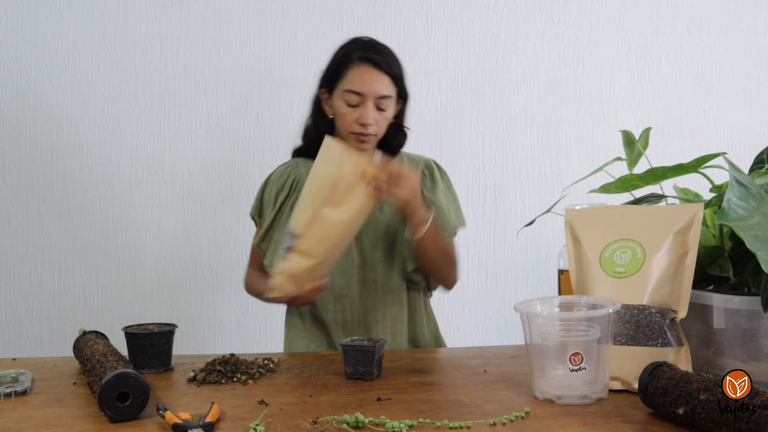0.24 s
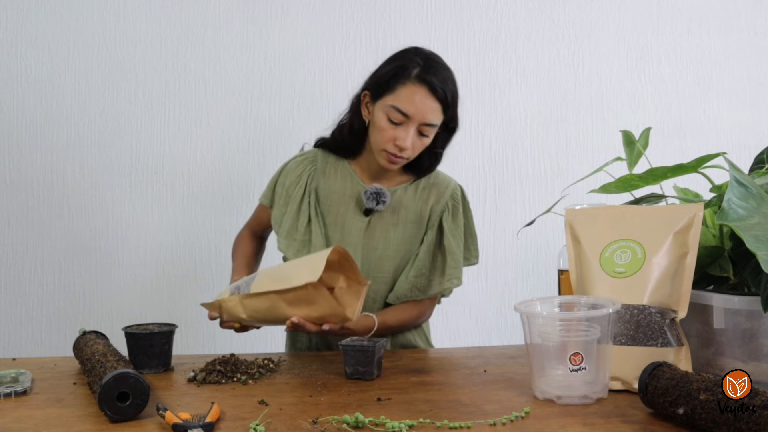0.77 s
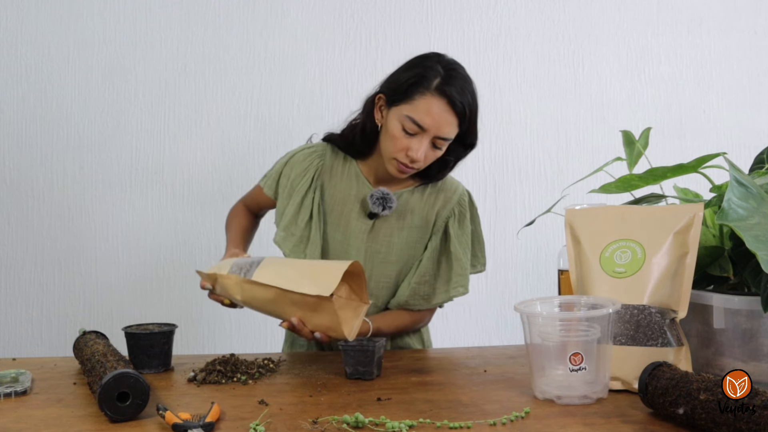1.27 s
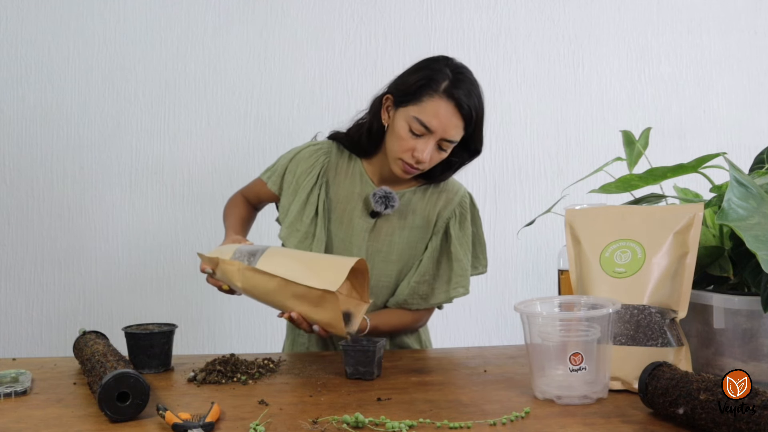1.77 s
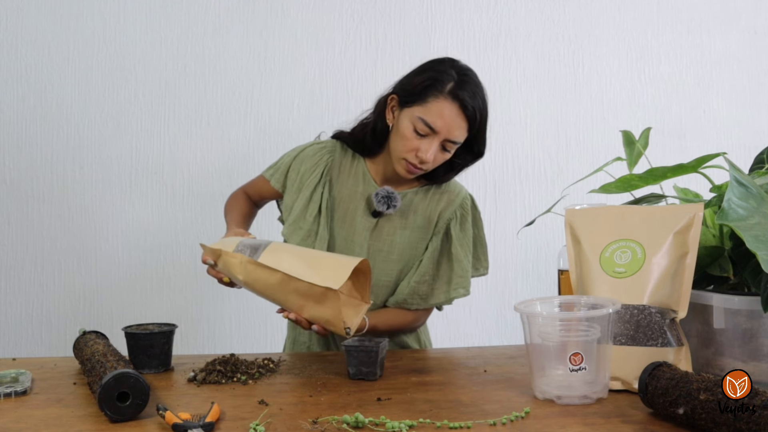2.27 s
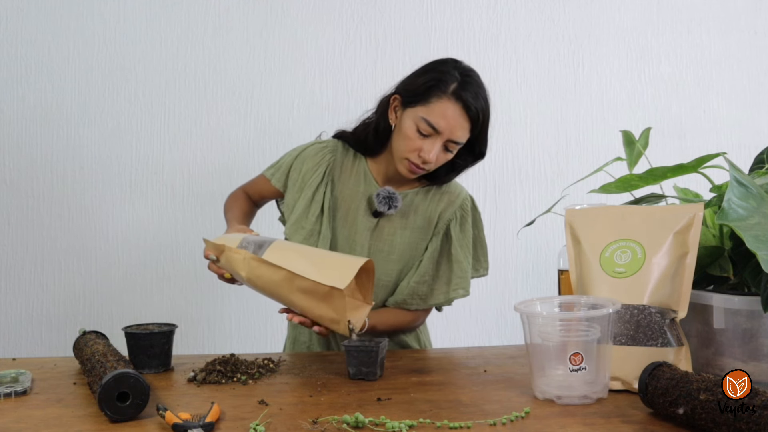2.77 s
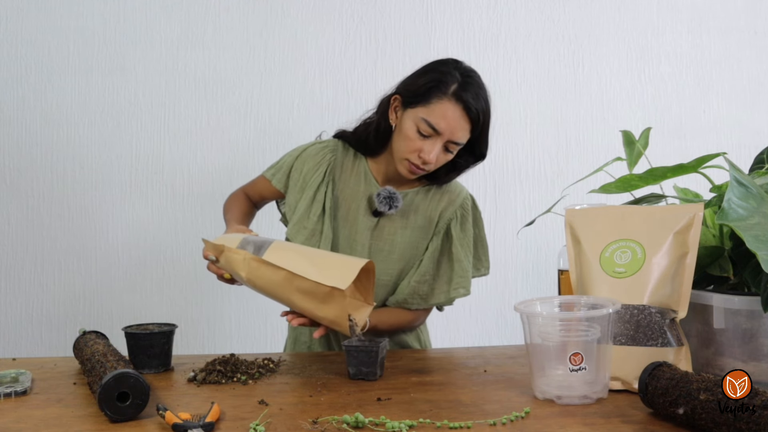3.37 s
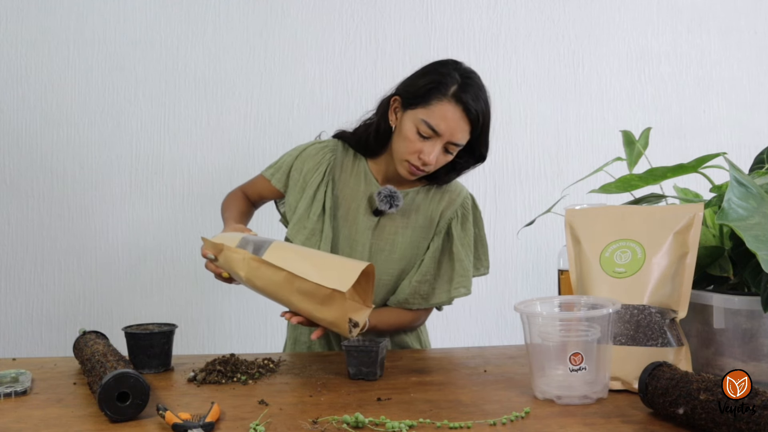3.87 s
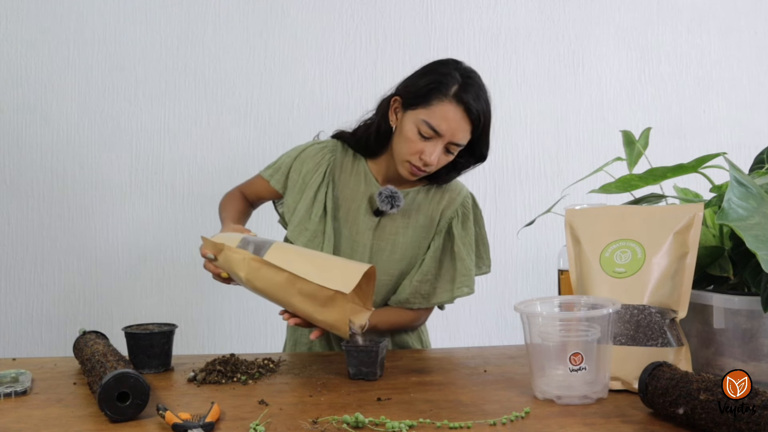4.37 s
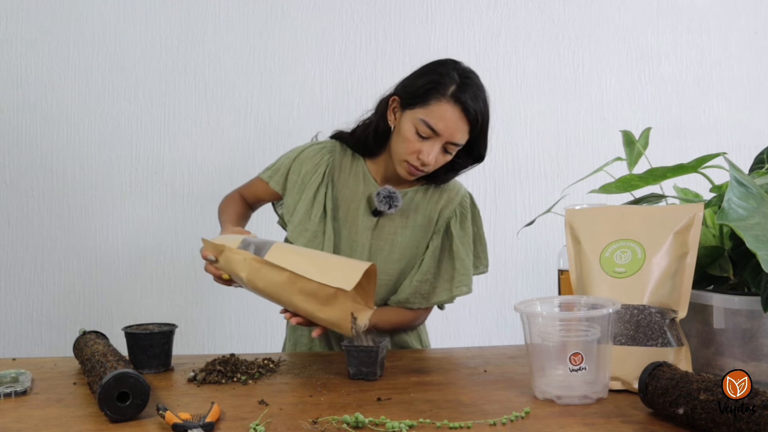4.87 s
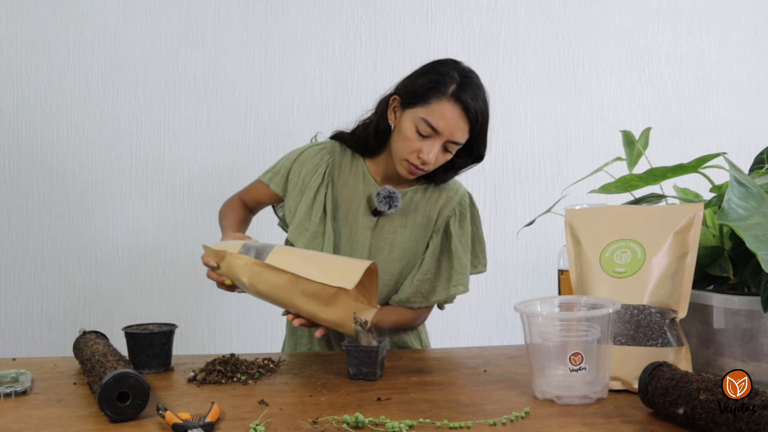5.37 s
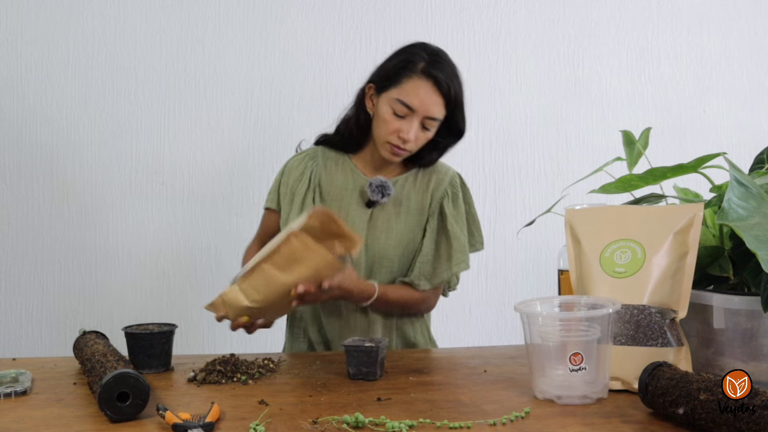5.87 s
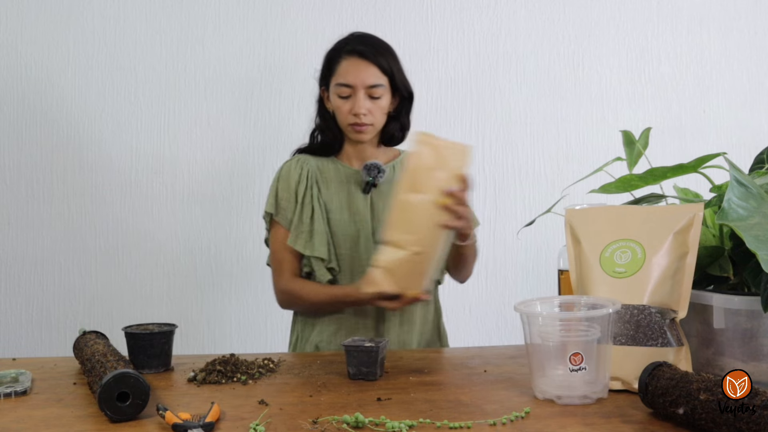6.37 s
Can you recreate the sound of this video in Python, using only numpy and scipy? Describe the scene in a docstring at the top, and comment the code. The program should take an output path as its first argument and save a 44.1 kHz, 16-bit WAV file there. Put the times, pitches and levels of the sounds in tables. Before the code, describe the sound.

Gritty potting mix slides down a crinkling paper bag and trickles in uneven spurts into a small plastic pot, heard close up.

```python
"""Potting mix poured from a paper bag

At a table, heard close up on a lapel microphone. The bag is tipped and the gritty mix slides down
it, trickles in spurts into a small plastic pot, then slides back as the bag is righted. Lumps drum
on the paper, fine grit hisses and rings the pot, creases snap. The moving arm shakes the microphone
at a low pitch; behind it all lie still air and a short room echo."""
import sys
import numpy as np
from scipy import signal
from scipy.fft import rfft, irfft, next_fast_len
from scipy.io import wavfile
from scipy.ndimage import uniform_filter1d, map_coordinates

SR = 44100
rng = np.random.default_rng(int(sys.argv[2]) if len(sys.argv) > 2 else 0)


def int16_out(signal):
    """Quantize to a 16-bit WAV file."""
    q = np.round(np.clip(np.atleast_2d(signal).T, -1, 1) * 32767)
    wavfile.write(sys.argv[1], SR, q.astype(np.int16))


N = 291724
TIME = np.arange(N) / SR


def amp(db):
    """Gain of a level in dB."""
    return 10 ** (np.asarray(db) / 20)


def unit(x):
    """x at rms 1."""
    return x / np.sqrt(np.mean(x ** 2) + 1e-20)


def along(points, hz):
    """(Hz, value) points joined on a log frequency axis."""
    knots, values = np.transpose(points)
    return np.interp(np.log(hz + 1), np.log(knots + 1), values)


def spectrum(points):
    """The response that runs through (Hz, dB) points."""
    return lambda hz: amp(along(points, hz))


def modes(table):
    """The causal response of (Hz, width Hz, dB) resonances."""
    return lambda hz: sum((-1) ** k * amp(db) * 1j * hz * width / (centre ** 2 - hz ** 2 + 1j * hz * width)
                          for k, (centre, width, db) in enumerate(table))


def filtered(x, response):
    """x times a complex response of frequency."""
    size = next_fast_len(N + SR // 2)
    return irfft(rfft(x, size) * response(np.fft.rfftfreq(size, 1 / SR)), size)[..., :N]


def wobble(rate):
    """A smooth random curve, rate knots a second."""
    return map_coordinates(rng.standard_normal(int(N * rate / SR) + 4), [TIME * rate])


def swells(start, lasts, db, rise, fall):
    """One gain curve per event: it rises until start, holds, then falls; slopes in dB per second."""
    t = TIME - start[:, None]
    attack_db = np.reshape(rise, (-1, 1)) * np.minimum(t, 0)
    return amp(db[:, None] + attack_db - fall * np.maximum(t - lasts[:, None], 0))


def bump(hz, centre, width):
    """A bell curve on a log frequency axis."""
    return np.exp(-(np.log((hz + 1) / centre) / width) ** 2)


def painted(x, gain):
    """x at rms 1, coloured by gain(hz, sample) at equal loudness, with random patches."""
    hz, t, frames = signal.stft(x, SR, nperseg=256)
    patches = uniform_filter1d(rng.standard_normal(frames.shape), size=4, axis=0)
    patches = unit(uniform_filter1d(patches, size=12, axis=1))
    colour = gain(hz[:, None], np.minimum((t * SR).astype(int), N - 1))
    loudness = np.sqrt(np.mean(np.abs(frames) ** 2, axis=1) @ colour ** 2)
    return unit(signal.istft(frames * colour / loudness * amp(2.12 * patches), SR, nperseg=256)[1][:N])


# The air around the table. Each row: frequency in Hz, relative level in dB.
AIR_SPECTRUM = [(15, -18), (25, 4), (107, -16), (723, -18), (2120, -24), (3180, -25.5), (3840, -24),
                (6400, -26.5), (11300, -31.5), (15600, -45)]


def still_air():
    """Faint, steady room noise, strongest in the deep bass."""
    return amp(-55.5) * unit(filtered(rng.standard_normal(N), spectrum(AIR_SPECTRUM)))


# The room beyond the table. Each row: frequency in Hz, seconds to die away by 60 dB.
ROOM_DECAY = [(200, 0.5), (2000, 0.043), (10000, 0.24)]


def room_echo(x):
    """Each frequency of the room's answer dies at its own speed."""
    hz, t, frames = signal.stft(rng.standard_normal(SR // 2), SR, nperseg=256)
    tail = signal.istft(frames * amp(-60 * t / along(ROOM_DECAY, hz)[:, None]), SR, nperseg=256)[1]
    return signal.fftconvolve(np.pad(x, (200, 0)), tail / np.linalg.norm(tail))[:N]


# Arm movements, felt right at the lapel.
# Each row: start in seconds, hold in seconds, relative level in dB, rumble as a ratio to the note.
ARM_MOVES = [(0.029, 0.27, -28.5, .4), (0.972, .1, -48, 0.27), (1.353, 0.49, -43, 0.36),
             (1.811, 0.028, -20.5, 0.49), (1.95, 0.14, -36.5, 0.39), (2.135, 0.12, -24.5, 0.12),
             (2.448, .1, -38, .1), (2.585, 0.15, -22.5, 0.17), (2.845, 0.0081, -42, 0.96),
             (2.979, 0.029, -41, .05), (3.082, 0.28, -33.5, 0.2), (3.44, 0.7, -49, 0.12),
             (4.304, 0.49, -57, .25), (4.792, 0.16, -49, 0.31), (5.19, 0.026, -48, .25),
             (5.452, 0.075, -47.5, 0.33), (5.943, 0.18, -51.5, .4), (6.227, 0.13, -32.5, 0.63),
             (6.474, 0.015, -31, 0.74)]
# The note of the swaying microphone. Each row: time in seconds, pitch in Hz.
SWAY_PITCH = [(0.0, 32.1), (1.2, 29.9), (1.8, 35.9), (1.969, 44), (2.129, 54.5), (2.8, 54.2), (3.06, 42.4),
              (3.33, 41), (3.47, 52.2), (4.1, 66), (4.38, 64), (4.68, 34.6), (4.95, 34.2), (5.2, 54),
              (5.451, 41.8), (5.728, 34.3), (6.62, 33)]


def microphone_shake():
    """The clipped-on microphone sways on the cloth: an unsteady low note with a rumble."""
    start, lasts, db, rumble_share = np.transpose(ARM_MOVES)
    levels = swells(start, lasts, db, rise=1000, fall=200) * amp(1.2 * wobble(3.9))
    hz = np.interp(TIME, *np.transpose(SWAY_PITCH)) * (1 + 0.026 * wobble(37))
    sway = np.sin(2 * np.pi * np.cumsum(hz) / SR)
    rumble = unit(filtered(rng.standard_normal(N), modes([(45.6, 36, 1.5), (125, 37, 0.5)])))
    return 0.84 * levels.sum(axis=0) * sway + 0.83 * (rumble_share @ levels) * rumble


# Creases and stones in the bag, within arm's reach. Each row: start in seconds, level in dB,
# knock in Hz, tick in Hz, tick weight in dB (halved to give the tick's share).
SNAPS = [(0.131, -13.5, 550, 4480, 1), (0.164, -19, 900, 4600, 1.5), (0.231, -17, 197, 6300, -50),
         (0.233, -21.5, 990, 6300, -50), (0.236, -18.5, 490, 6300, -24), (0.4, -20, 920, 4470, -12),
         (0.454, -19.5, 1220, 4970, -11), (0.491, -9, 1120, 4870, -27), (0.501, -6, 720, 4900, -34),
         (0.528, -11.5, 1450, 2980, -30), (0.534, -11, 640, 3200, -29), (0.547, 1, 890, 3230, -39),
         (0.567, -22, 800, 3800, -10), (0.59, -10, 710, 4400, -17), (0.634, -13, 1400, 4600, 5),
         (0.699, -6, 334, 3750, -19), (0.704, -3, 1150, 3970, -30), (0.841, -8.5, 1890, 4200, -25),
         (0.906, -11.5, 870, 5280, -45), (0.929, -15, 1080, 3360, -32), (0.965, -10, 1370, 3400, -40),
         (0.978, -7.5, 1770, 3470, -43), (1.029, -25, 760, 3700, -3), (1.059, -0.5, 725, 4670, -35),
         (1.095, -13.5, 1180, 3380, -19), (1.123, -11, 1710, 3430, -47), (1.19, -33, 1213, 7000, -8),
         (1.205, -4.5, 1650, 6400, -31), (1.225, -13, 1440, 3460, -37), (1.258, -24, 1310, 3540, -30),
         (1.283, -17, 630, 3500, -21), (1.304, -12, 467, 5030, -36), (1.325, -13.5, 686, 5200, -11),
         (1.353, -10.5, 1160, 6950, -15), (1.38, -10.5, 1580, 6630, -30), (1.415, -20, 807, 6960, 0),
         (1.431, -12, 520, 7360, -3.5), (1.473, -11, 1550, 5070, -35), (1.54, -9, 1110, 5140, -36),
         (1.744, -24.5, 125, 5000, -50), (1.78, -28, 1170, 5000, -33), (1.837, -18.5, 705, 4930, -28),
         (1.862, -15, 1280, 3020, -29), (1.87, -2, 990, 7300, -39), (1.874, -2, 630, 4940, -52),
         (1.879, -12, 650, 5000, -46), (1.898, -4.5, 820, 7530, -13), (1.901, 3, 815, 4420, -22.5),
         (1.925, -7.5, 895, 3300, -12.5), (1.927, -22.5, 910, 7200, 0), (1.947, -6.5, 1450, 7260, -20.5),
         (1.95, -11.5, 900, 3320, -29), (1.973, -8, 1160, 3200, -40), (2.172, -27, 477, 5100, -22),
         (2.188, -18, 1060, 6700, -8), (2.192, -19.5, 2010, 6050, -28), (2.232, -27, 1660, 3980, -34),
         (2.255, -30, 1070, 3980, -33), (2.299, -16.5, 1600, 4300, -10.5), (2.316, -19.5, 1500, 2680, -7),
         (2.318, -22, 1550, 6970, 0), (2.356, -27.5, 1600, 7040, 0), (2.38, -28.5, 443, 7000, -3),
         (2.406, -28, 820, 4470, -20), (2.425, -22, 485, 4320, -23), (2.448, -26, 1460, 4660, -35),
         (2.475, -24.5, 377, 6860, -38), (2.521, -11, 1440, 7160, -1.5), (2.566, -17, 370, 4250, -22),
         (2.574, -10.5, 325, 4330, -53), (2.585, -17, 123, 3040, -50), (2.69, -31, 137, 3040, -55),
         (2.587, -9, 780, 3000, -42), (2.602, -10.5, 920, 4760, -18), (2.621, -25, 909, 4400, -3),
         (2.689, -10, 875, 4370, -55), (2.829, -31, 633, 4500, 24), (2.889, -33.5, 480, 4430, -16),
         (2.932, -32, 1620, 4400, -25), (3.067, -26, 1030, 4600, -14), (3.1, -21, 766, 4680, -4),
         (3.121, -19, 1480, 4870, -3), (3.128, -15.5, 1000, 4800, 0), (3.129, -18.5, 1000, 6950, 0),
         (3.211, -18, 940, 8040, 0.6), (3.322, -22.5, 1390, 6370, -3), (3.338, -20.5, 993, 9500, 0),
         (3.366, -25, 960, 3320, -11), (3.384, -22, 950, 3180, -7), (3.393, -23, 940, 4700, -3),
         (3.484, -30.5, 217, 3170, -1), (3.486, -28, 900, 6300, 5), (3.599, -28, 724, 2720, -15),
         (3.648, -26, 1460, 3250, -1), (3.646, -32, 900, 6300, 0), (3.82, -25, 970, 6200, 0),
         (3.819, -21.5, 990, 3190, -1), (3.844, -29, 865, 3330, -3), (3.891, -26.5, 1350, 3170, -12),
         (3.895, -24, 300, 9200, -2), (3.904, -24.5, 1300, 3230, -2), (3.915, -26.5, 1100, 3280, -7),
         (3.949, -36, 620, 3300, -21), (3.999, -34.5, 1062, 5900, 0), (4.022, -36, 690, 2630, 0.5),
         (4.091, -19, 924, 6200, 0), (4.101, -15, 694, 5980, -6), (4.115, -19, 750, 3260, -8),
         (4.151, -13, 1152, 2750, -19), (4.19, -26, 905, 3130, 0), (4.203, -31, 700, 3220, 3),
         (4.251, -28, 1560, 3240, -2.5), (4.345, -16.5, 490, 3140, -4.5), (4.368, -15.5, 825, 3080, -8),
         (4.422, -18, 1570, 3230, -1), (4.422, -12.5, 1570, 6900, 0), (4.454, -22.5, 420, 6100, -3),
         (4.468, -31, 700, 6460, 0), (4.505, -23.5, 1540, 5640, -5), (4.534, -23.5, 1610, 3380, -12),
         (4.556, -27, 1600, 6200, 0), (4.58, -25.5, 945, 5900, -3), (4.62, -24, 1660, 3130, -7),
         (4.635, -20, 1580, 3240, -7), (4.702, -23, 524, 6000, -4.5), (4.738, -37, 890, 5960, 0),
         (4.748, -23.5, 542, 6050, 0), (4.756, -20, 905, 6100, 0), (4.815, -24, 1910, 6400, -6),
         (4.837, -21.5, 1430, 7000, 0), (4.895, -23, 1320, 6700, -5), (4.922, -26.5, 1310, 7040, 0),
         (5.001, -27.5, 1260, 2550, -21), (5.104, -29.5, 1250, 2730, -7.5), (5.201, -32.5, 1300, 7120, 0),
         (5.223, -38, 970, 3330, -14), (5.362, -35.5, 1490, 7050, -12), (5.394, -37, 1600, 3080, -10),
         (5.427, -32, 1610, 7050, -2), (5.452, -20.5, 1640, 6640, -2), (5.463, -33, 1655, 7150, 0),
         (5.476, -23, 1800, 7300, -1), (5.502, -24.5, 1710, 7060, 0), (5.532, -34, 1610, 5230, 2),
         (5.612, -44, 900, 6700, 4.5), (5.649, -49, 900, 5960, 0), (5.704, -53, 900, 6000, 1.5),
         (5.719, -57, 1500, 2900, -1), (5.749, -55, 900, 6830, 0), (5.776, -50.5, 900, 3310, 2),
         (5.814, -31.5, 1207, 3150, -1), (5.815, -31.5, 1207, 5770, -1), (6.185, -19.5, 462, 3330, -43),
         (6.24, -1.5, 1364, 7300, -25), (6.24, -9, 1350, 4900, 0), (6.267, -6.5, 660, 6940, -4),
         (6.262, -11.5, 234, 5000, -31), (6.292, -8, 720, 5100, -26), (6.397, -1.5, 640, 4950, -46),
         (6.475, 0, 775, 5380, -2.5), (6.4, -12, 215, 4800, -40), (6.479, -8, 257, 5130, -29),
         (6.503, -9, 2050, 4100, -13)]
# The loaded bag's own thump and slap. Each row: frequency in Hz, width in Hz, gain in dB.
BELLY_MODES = [(124.6, 73, -21), (1040, 680, -17)]


def snaps():
    """Each snap is a hollow knock of the paper and a bright tick, rung by a crack and a run of crumbs."""
    out, t = np.zeros(N + SR), np.arange(SR // 5) / SR
    hz = np.fft.rfftfreq(len(t), 1 / SR)
    # Pairs hold the knock first, then the tick.
    low_hz, high_hz = np.array([[130], [2000]]), np.array([[2800], [10000]])
    crack_t60_s, rattle_t60_s = [[.018], [.012]], 0.15
    soft_contact = (1j * hz / (1j * hz + low_hz) / (1 + 1j * hz / high_hz)) ** 2
    push = 4.6 * np.array([[1], [0.53]]) * np.exp(-t / 0.000076)  # the paper gives way all at once
    onset = 1 - np.exp(-t / 0.00026)
    crumbs = amp(3.5 * wobble(250))
    for start, db, knock_hz, tick_hz, tick_db in SNAPS:
        at = round(start * SR)
        rattle = 0.12 * amp(-60 * t / rattle_t60_s) * np.resize(crumbs[at:], len(t))
        crack = rng.standard_normal((2, len(t))) * (amp(-60 * t / crack_t60_s) + rattle) * onset
        knock = modes([(knock_hz, .2 * knock_hz, 0), (1.6 * knock_hz, .25 * knock_hz, -6),
                       (.55 * knock_hz, .2 * knock_hz, -13), *BELLY_MODES])(hz)
        tick = modes([(tick_hz, .08 * tick_hz, 0), (1.45 * tick_hz, .1 * tick_hz, -14),
                      (.68 * tick_hz, .07 * tick_hz, -12)])(hz)
        if TIPPING[-1][0] < start < RIGHTING[0][0]:  # while pouring, stones ring chute and pot as well
            tuning = np.interp(start, *np.transpose(GRIP))
            knock *= 0.38 + modes(CHUTE_MODES)(hz / tuning)
            tick += 0.17 * modes(POT_MODES)(hz)
            tick *= 0.33 + modes([(tick_hz, .45 * tick_hz, 0)])(hz)
        pair = irfft(rfft(crack + push) * [knock, tick] * soft_contact, len(t))
        pair /= np.abs(pair).max(axis=1, keepdims=True)
        share = min(amp(tick_db / 2), .99)  # what the tick takes, the knock lacks
        out[at:at + len(t)] += amp(db) * (np.sqrt(1 - share ** 2) * pair[0] + share * pair[1])
    return out[:N]


def grains(rate, spread_db, clump_db, hiss, life_s):
    """Uneven impacts, rate a second, swelling in clumps over the hiss of grains too fine to tell apart."""
    unevenness = np.minimum(rng.exponential(size=N), 3)  # capped so no single grain sticks out
    hits = (rng.random(N) < rate / SR) * amp(spread_db * unevenness)
    crumbs = signal.lfilter([1], [1, -np.exp(-1 / (life_s * SR))], hits) * rng.standard_normal(N)
    return unit(amp(clump_db * wobble(40)) * (unit(crumbs) + hiss * rng.standard_normal(N)))


def lumps(level, note_hz, grit_level, colour, rate, hiss, width, body, overtone, blend=1):
    """Coarse pieces drum on the bag; its hollow note moves with the load, and grit adds a hard edge."""
    grittiness_db = np.clip(20 * np.log10(grit_level / level + 1e-9), -30, 0)
    edge_db = 3 + 0.26 * grittiness_db + 4.5 * wobble(16)
    drum = filtered(grains(rate, spread_db=-3.5, clump_db=1.73, hiss=hiss, life_s=0.0016), colour)
    drum = (np.atleast_2d(drum) * blend).sum(axis=0)  # several colours cross-fade into a moving one

    def hollow_and_edge(hz, at):
        hollow = body + bump(hz, note_hz[at], width) + overtone * bump(hz, 1.64 * note_hz[at], width)
        return hollow * amp(edge_db[at] / (1 + (1250 / (hz + 1)) ** 6))
    return level * painted(unit(drum), hollow_and_edge)


def grit(level, fizz_hz, sheen_db, wall_db, colour, rate, hiss, sheen_hz, focus):
    """Fine grit: a dense patter with a fizzing centre and a top sheen; the larger bits ring the wall."""
    ring_db = wall_db + 2.5 * wobble(11)
    sheen = lambda hz, at: amp(sheen_db[at] / (1 + (sheen_hz / (hz + 1)) ** 8))
    fizz = lambda hz, at: 1 + focus * bump(hz, fizz_hz[at], .16)
    ring = lambda hz, at: amp(ring_db[at] / (1 + (hz / 3700) ** 12))
    patter = unit(filtered(grains(rate, spread_db=2.0, clump_db=-0.74, hiss=hiss, life_s=0.0017), colour))
    return level * painted(patter, lambda hz, at: sheen(hz, at) * fizz(hz, at) * ring(hz, at))


# The bag in the hand, under lumps and under grit. Each row: frequency in Hz, relative level in dB.
BAG_DRUM = [(59, -39), (100, -15.5), (284, 4.5), (338, 9), (402, 5), (613, -2), (1080, -5), (2160, 3),
            (2850, -14), (3200, -7), (4160, -66.5), (7040, -120)]
PAPER_RUSTLE = [(1180, -95), (2000, -25.5), (2180, -6.5), (2920, -5.5), (3620, 0.5), (5700, -11),
                (6590, -3.5), (9130, -1), (10700, -4.5), (11700, -15), (15600, -30)]
# The load sliding close to the microphone, one list for tipping the bag and one for righting it.
# Each row: time in seconds, lump level in dB, grit level in dB, hollow note in Hz.
LOAD_SLIDES = [
    [(0.0, -63, -51.5, 595), (0.13, -53, -33.5, 915), (0.24, -45, -36.5, 1090), (0.3, -42, -35.5, 980),
     (0.38, -37.5, -33.5, 920), (0.45, -30.5, -40, 715), (0.6, -20.5, -30, 890), (0.7, -17, -23, 890),
     (0.83, -25, -29, 1100), (0.92, -27.5, -38.5, 920), (1.0, -34.5, -42, 905), (1.12, -31, -37, 860),
     (1.2, -31.5, -39, 1300), (1.27, -26.5, -46, 1160), (1.33, -25.5, -36, 820), (1.44, -22, -28.5, 880),
     (1.6, -18, -33, 800), (1.7, -23, -36, 980), (1.79, -35.5, -46, 920), (1.85, -29.5, -61, 730),
     (1.92, -50, -61, 743)],
    [(5.92, -75, -71, 863), (5.98, -44.5, -34, 615), (6.01, -27.5, -28, 604), (6.05, -29, -29, 530),
     (6.1, -30, -32.5, 528), (6.17, -28.5, -38.5, 490), (6.195, -21, -33.5, 555), (6.232, -25, -30, 530),
     (6.25, -14.5, -24, 522), (6.3, -17, -23.5, 534), (6.39, -26, -32.5, 630), (6.45, -35, -42.5, 626),
     (6.52, -24.5, -25.5, 545), (6.62, -46.5, -46.5, 410)],
]
TIPPING, RIGHTING = LOAD_SLIDES


def slide(rows, rate, hiss, width, body, overtone, sheen_db, wall_db):
    """The whole load shifts inside the bag: lumps drum and grit rustles on the paper."""
    times, lump_db, grit_db, note_hz = np.transpose(rows)
    lump_level = amp(np.interp(TIME, times, lump_db, left=-200, right=-200))
    grit_level = amp(np.interp(TIME, times, grit_db, left=-200, right=-200))
    note_hz = np.interp(TIME, times, note_hz)
    fizz_hz = 5500 * np.exp(0.12 * wobble(8.3))
    rustle = grit(grit_level, fizz_hz, np.full(N, sheen_db), wall_db, spectrum(PAPER_RUSTLE),
                  rate=1900, hiss=0.52, sheen_hz=7700, focus=1.0)
    drum = lumps(lump_level, note_hz, grit_level, spectrum(BAG_DRUM), rate, hiss, width, body, overtone)
    return drum + rustle


# The raised, half-empty bag, before and after the load rests on its bottom.
# Each row: frequency in Hz, gain in dB.
UPRIGHT_COLOUR = [(250, -12), (450, 1), (1100, 3.5), (1550, -8.5), (2150, 2), (2700, -7), (3700, -7),
                  (5000, 0.5)]
SETTLED_COLOUR = [(250, -5), (450, -2.5), (1100, 0.5), (1600, -2), (2000, -8), (2600, -7.5), (3300, -3.5),
                  (5000, 0.5)]


def righted_bag():
    """The load slides back, and the bag's colour changes as it settles on the bottom."""
    load = slide(RIGHTING, rate=1200, hiss=1.0, width=0.201, body=0.19, overtone=0.96,
                 sheen_db=-9.0, wall_db=1.0)
    settled = np.clip((TIME - 6.05) / 0.033, 0, 1)
    falling = filtered(load * (1 - settled), spectrum(UPRIGHT_COLOUR))
    return falling + filtered(load * settled, spectrum(SETTLED_COLOUR))


# The open bag held as a chute over the pot. Each row: frequency in Hz, width in Hz, gain in dB.
CHUTE_MODES = [(131, 590, 0), (360, 54, 8.5), (469, 42, 4.5), (758, 123, 5.5), (982, 79, 4.5),
               (1460, 113, 6.5), (1650, 72, 8), (2300, 300, 1.5)]
# The hand squeezing the chute. Each row: time in seconds, tuning as a ratio.
GRIP = [(1.9, 1.066), (2.2, 1.062), (2.35, 1), (2.45, 0.98), (2.7, 0.96), (3.3, 1.026), (4.1, 0.973),
        (4.45, 0.96), (4.55, 1.03), (4.75, 1.07), (4.95, 0.94), (5.2, 0.96), (5.36, 1.0), (5.5, 1.01)]


def chute_lumps(level, note_hz, grit_level):
    """Soft lumps tumble down the paper chute, whose notes move as the hand squeezes it."""
    tunings = np.array([[.94], [1], [1.06], [1.12]])
    grip = np.interp(TIME, *np.transpose(GRIP)) + 0.024 * wobble(16)
    grip = np.clip(grip, tunings[0], tunings[-1])
    blend = np.sqrt(np.maximum(1 - np.abs(grip - tunings) / .06, 0))
    chute = lambda hz: modes(CHUTE_MODES)(hz / tunings) ** 1.435 / (1 + (hz / 2300) ** 6)
    return lumps(level, note_hz, grit_level, chute, rate=210, hiss=0.88, width=0.3, body=0.76,
                 overtone=0.053, blend=blend)


# The pot's walls and the table's echo, within arm's reach.
# Each row: frequency in Hz, width in Hz, gain in dB.
POT_MODES = [(2627, 170, 9.5), (3276, 156, 11), (4810, 540, -4), (7000, 1100, -7.5), (9370, 800, -3),
             (13370, 420, -22)]
# How strongly the wall rings, least once the pot has filled. Each row: time in seconds, gain in dB.
WALL_RING = [(1.9, -12), (2.3, -14.5), (2.8, -13), (3.2, -18.5), (3.6, -5), (4.0, -8), (4.4, -4),
             (4.7, -10), (4.9, -13.5), (5.2, -6.5), (5.5, -22)]


def pot_grit(level, fizz_hz, sheen_db):
    """Grit lands in the plastic pot and rings its walls."""
    wall_db = np.interp(TIME, *np.transpose(WALL_RING))
    return grit(level, fizz_hz, sheen_db, wall_db, modes(POT_MODES),
                rate=1100, hiss=0.41, sheen_hz=8400, focus=1.9)


# Mix leaving the bag just in front of the microphone. Each row: start in seconds, hold in seconds,
# grit level in dB, lump level in dB, hollow note in Hz, fizz centre in Hz, sheen in dB,
# the grit's rise in dB per second.
MIX_SPURTS = [(1.886, 0.059, -37.5, -26.5, 750, 5100, 9, 254),
              (1.979, 0.01, -44, -25, 1250, 7200, -6, 264.5),
              (2.108, 0.056, -54.5, -41, 1524, 7100, -2, 259),
              (2.187, 0.015, -45, -33, 1170, 7150, -14, 2500),
              (2.294, 0.05, -50.5, -34.5, 1600, 7300, -31, 2500),
              (2.346, 0.08, -49, -48, 523, 4550, -18, 400.5),
              (2.517, 0.027, -37, -27.5, 1400, 7100, 4, 260.5),
              (2.595, 0.025, -37.5, -32.5, 435, 4800, -6, 503),
              (2.681, 0.03, -42, -30, 900, 4660, -0.5, 1500),
              (2.977, 0.076, -41.5, -38, 1470, 7900, -4.5, 257.5),
              (3.105, 0.022, -36, -37, 1030, 5040, -3.5, 267),
              (3.208, 0.033, -31.5, -40.5, 870, 7840, 2.5, 260.5),
              (3.318, 0.018, -33.5, -43, 1470, 6340, 8, 601.5),
              (3.376, 0.018, -37, -38.5, 1000, 4920, 9, 1000),
              (3.492, 0.06, -46.5, -49.5, 614, 6140, 12, 1500),
              (3.612, 0.033, -48, -48.5, 1200, 4940, 7.5, 254), (3.705, 0.1, -61, -55, 900, 9500, -3, 259),
              (3.815, 0.012, -41, -43.5, 1080, 6200, 4, 2000),
              (3.896, 0.027, -46.5, -49.5, 700, 6300, 17, 1500),
              (3.96, 0.052, -56, -59, 700, 6000, 7, 257.5), (4.083, 0.025, -27.5, -36, 800, 6100, 8, 223),
              (4.12, 0.034, -50, -30.5, 660, 5900, 10, 260), (4.309, 0.045, -33, -32, 694, 6100, 10, 254),
              (4.422, 0.025, -38, -36.5, 690, 6260, -3, 1500),
              (4.531, 0.11, -39, -39, 1600, 6100, 2.5, 260.5),
              (4.676, 0.06, -41, -36.5, 840, 6070, -3.5, 259.5),
              (4.84, 0.015, -31, -36, 1440, 6900, -2, 261),
              (4.905, 0.014, -45.5, -39, 1250, 6900, -24, 261),
              (5.01, 0.022, -57, -47.5, 1280, 6000, -9, 260),
              (5.103, 0.09, -53.5, -45, 1400, 6930, -6.5, 1500),
              (5.367, 0.05, -52.5, -45.5, 1600, 7100, -9, 1998),
              (5.442, 0.07, -45.5, -46.5, 1645, 7100, -12, 263),
              (5.815, 0.025, -56.5, -73, 1210, 4500, -3, 2498.5)]


def pour():
    """Each spurt sends grit into the pot and, just behind it, lumps down the chute."""
    start, lasts, grit_db, lump_db, note_hz, fizz_hz, sheen_db, rise = np.transpose(MIX_SPURTS)
    lump_lag_s = 0.0083
    grit_power = swells(start, lasts, grit_db, rise, fall=213) ** 2 + 1e-30
    lump_power = swells(start + lump_lag_s, lasts, lump_db, 0.73 * rise, fall=158) ** 2 + 1e-30
    grit_level, lump_level = np.sqrt(grit_power.sum(axis=0)), np.sqrt(lump_power.sum(axis=0))
    weighted = lambda column, power: column @ power / power.sum(axis=0)  # the loudest spurts set the tone
    trickle = pot_grit(grit_level, weighted(fizz_hz, grit_power), weighted(sheen_db, grit_power))
    return trickle + chute_lumps(lump_level, weighted(note_hz, lump_power), grit_level)


def scene():
    """Bag and pot close to the lapel, the room faint behind them; one channel."""
    tipped_bag = slide(TIPPING, rate=920, hiss=0.57, width=0.3, body=0.18, overtone=0.12,
                       sheen_db=-1.5, wall_db=-4.5)
    near = tipped_bag + pour() + snaps() + righted_bag()
    return (still_air() + near + amp(-14.0) * room_echo(near) + microphone_shake())[None]


def record(dry):
    """The loudest snaps are squeezed near full scale; nothing is kept above 15.7 kHz."""
    limited = dry / (1 + np.abs(dry / .96) ** 6) ** (1 / 6)
    return filtered(limited, lambda hz: hz < 15700)


dry = scene()
out = record(dry)
int16_out(out)
```